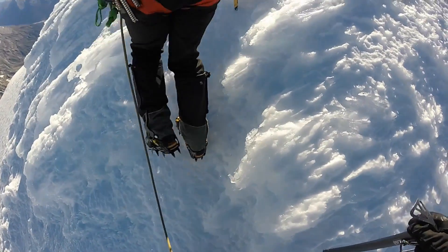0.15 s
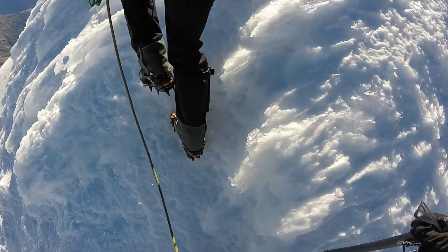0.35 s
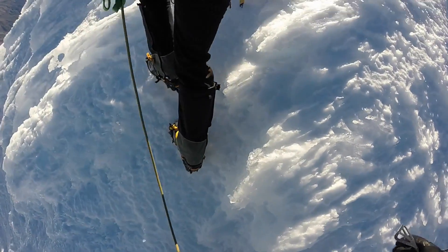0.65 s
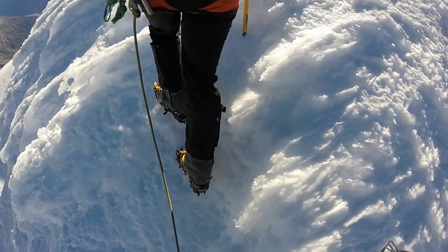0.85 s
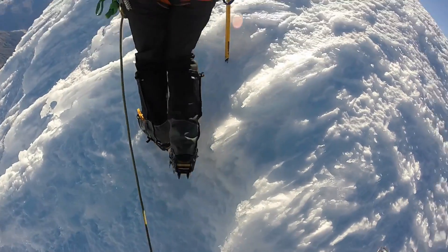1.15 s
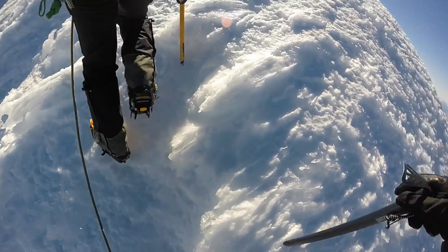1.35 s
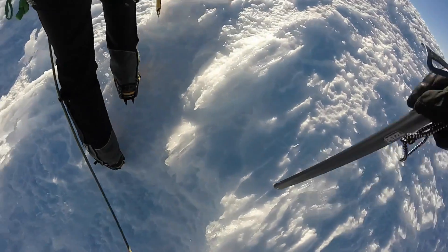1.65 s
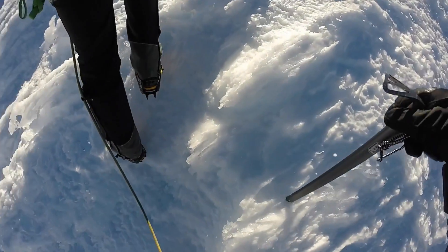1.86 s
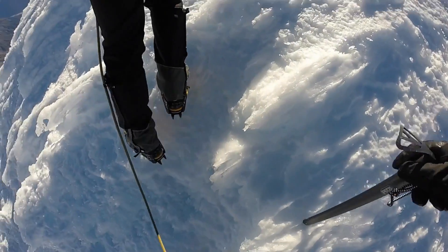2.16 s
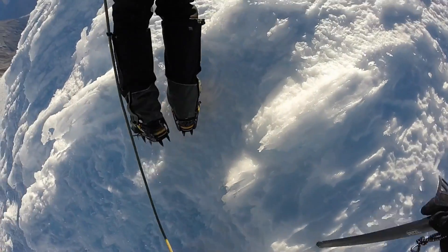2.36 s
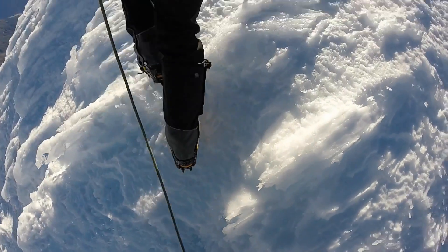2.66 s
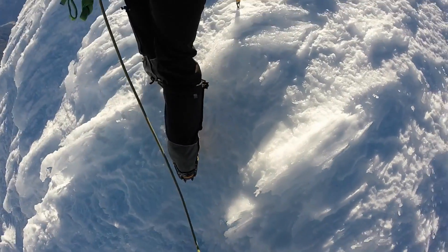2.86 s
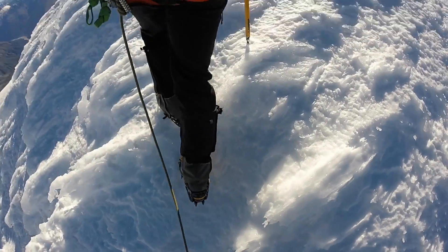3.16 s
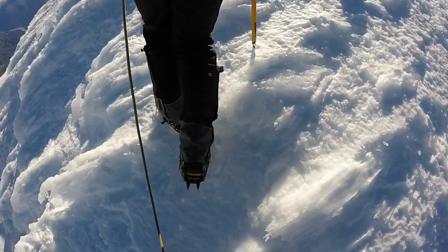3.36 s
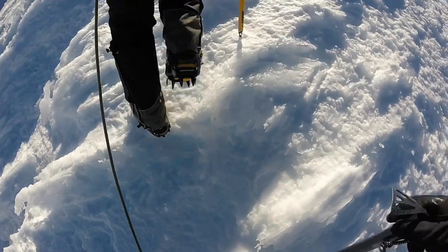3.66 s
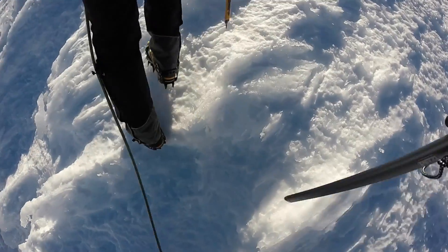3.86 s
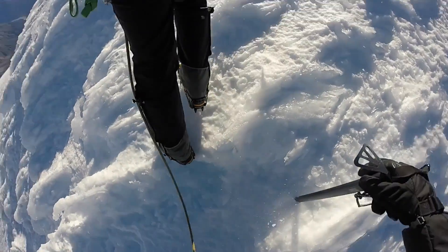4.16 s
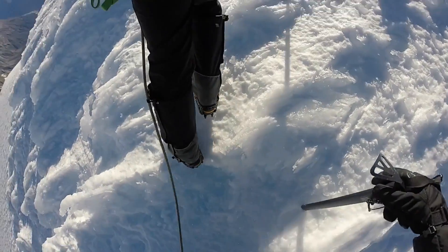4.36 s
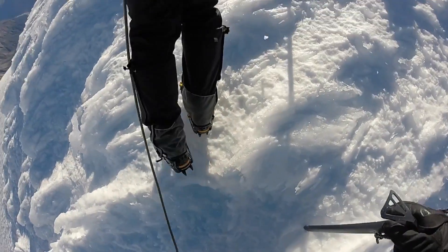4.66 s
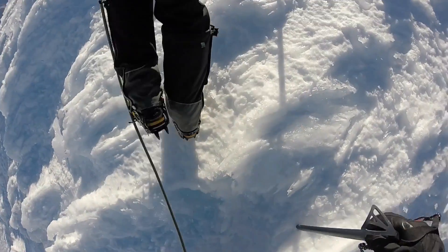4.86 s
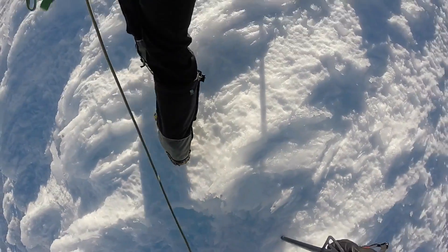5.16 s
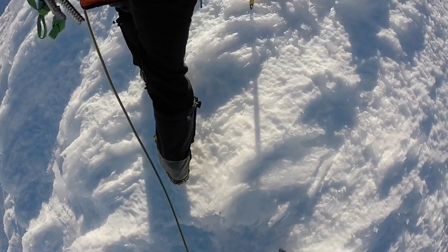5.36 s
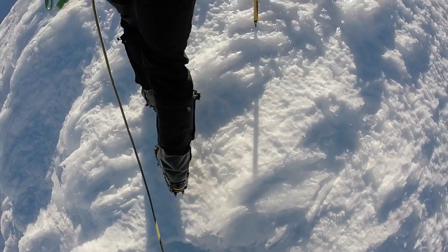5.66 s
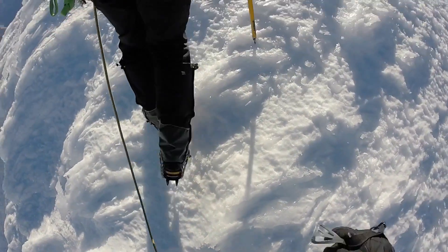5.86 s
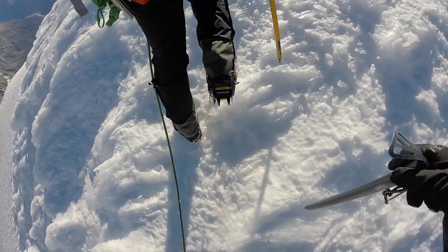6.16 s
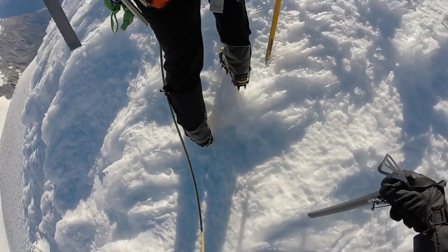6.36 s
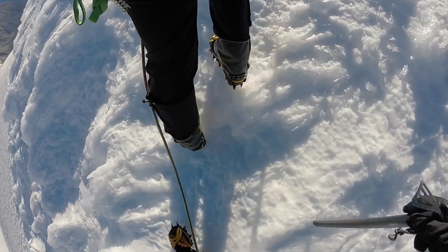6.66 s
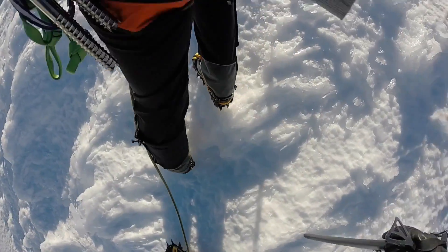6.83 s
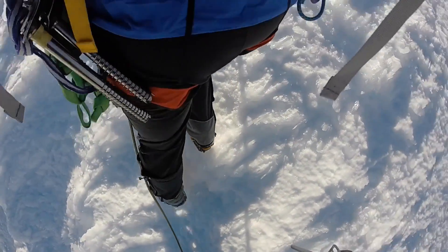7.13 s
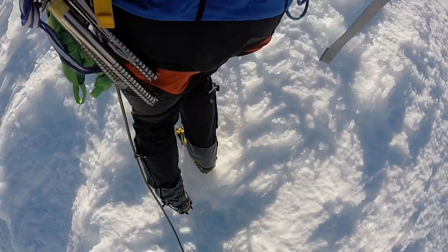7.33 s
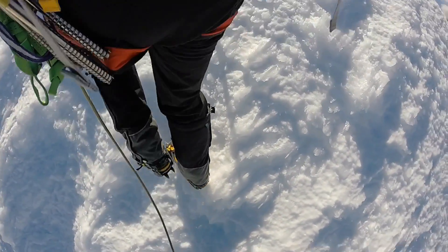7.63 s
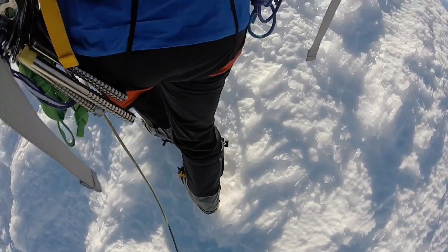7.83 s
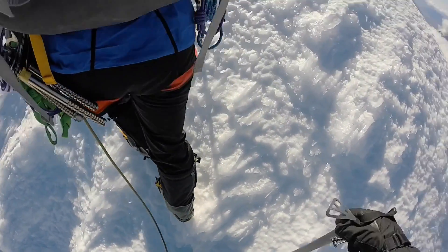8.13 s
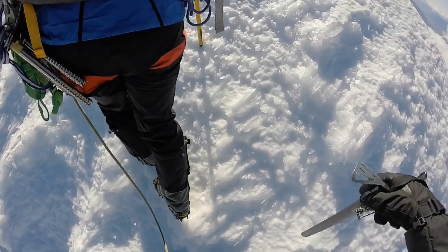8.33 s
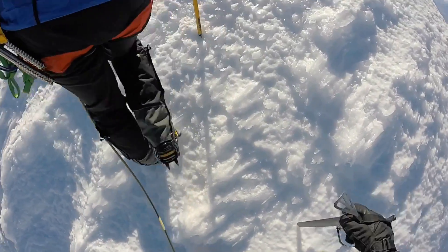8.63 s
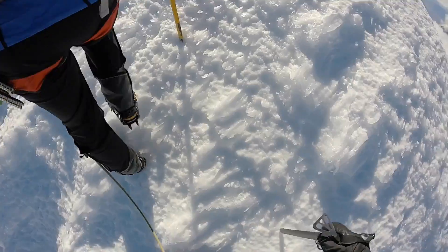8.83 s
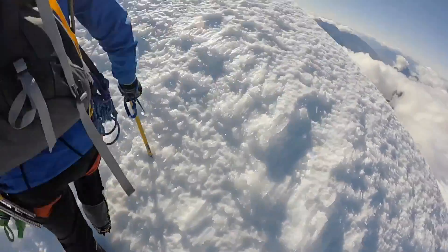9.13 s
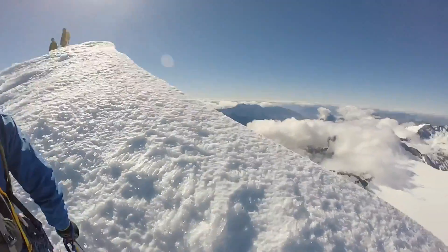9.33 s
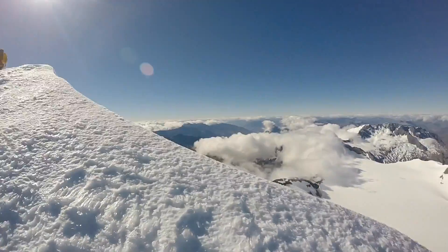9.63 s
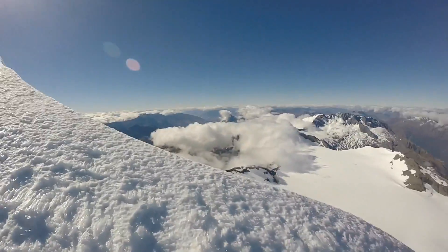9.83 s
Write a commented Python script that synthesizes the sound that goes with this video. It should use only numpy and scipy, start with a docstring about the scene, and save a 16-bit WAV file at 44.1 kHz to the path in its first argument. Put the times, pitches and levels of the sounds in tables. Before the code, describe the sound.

On an open snowy ridge, spiked boots crunch through icy crust close to a microphone in a hard, slightly boxy case. From the start, grainy treads overlap at uneven walking pace, while deep, soft wind thumps bump irregularly over low rumble and faint air. A gust flutters near 1 s; crisp bites and cracks follow at 1.6 and 1.75, with dull fabric swishes around 1.3 to 1.7 and 2.4. A light scrape passes at 2.6. The heaviest wind thump lands about 3.2, just before thin steel squeaks until 3.4. A sharp spike bite breaks at 4.1, and a fuller crunch comes at 4.6, with strong thumps near 4.9. Carabiners clatter quickly around 6.45, then a firm step at 6.7. Short scrapes touch at 6.8 and 7.8. After 8.8 the crunch softens and lengthens, gusts flutter near 9.2, a small metal tick sounds at 9.46, and ice cracks at 9.5.

```python
"""A ridge of crusted snow: two roped climbers walk up it in crampons, heard beside a wind-struck hard case.
The snow crunches as filtered random grains gated by each tread; spikes and cracks are short resonant bursts.
Clothing swishes as coloured grains; metal gear clinks, squeaks and scrapes with modes, tones and resonances.
Wind thumps the case as uneven low sines over rumble, with fluttering gusts and a soft rush of air."""
import sys
import numpy as np
from scipy import signal
from scipy.fft import rfft, irfft, next_fast_len
from scipy.io import wavfile
from scipy.ndimage import uniform_filter1d

SR = 44100
rng = np.random.default_rng(int(sys.argv[2]) if len(sys.argv) > 2 else 0)


def bounce(signal):
    """Save signal as a 16-bit WAV file at the path given by the first command-line argument."""
    frames = np.transpose(np.atleast_2d(signal))
    limited = np.clip(frames, -1, 1)
    pcm = np.round(limited * 32767).astype(np.int16)
    wavfile.write(sys.argv[1], SR, pcm)


N = 440559
TIME = np.arange(N) / SR


def from_db(db):
    """Decibels to gain."""
    return 10 ** (np.asarray(db) / 20)


def rms_one(x):
    """Scale to rms 1."""
    return x / np.sqrt(np.mean(x ** 2) + 1e-20)


def in_time(rows):
    """Draw each column of a breakpoint table as a curve, sample by sample."""
    s, *columns = np.transpose(rows)
    return [np.interp(TIME, s, column) for column in columns]


def at_hz(spectrum, hz):
    """Read a spectrum on a log-frequency axis."""
    points, db = np.transpose(spectrum)
    return np.interp(np.log(hz), np.log(points), db)


def colour(x, spectrum):
    """Shape x with a smooth spectrum; rms 1."""
    size = next_fast_len(N)
    bins = np.maximum(np.arange(size // 2 + 1) * SR / size, 1)
    shaped = rfft(x, size) * from_db(at_hz(spectrum, bins))
    return rms_one(irfft(shaped, size)[:N])


def drift(rate):
    """Random curve with rms 1, bending at `rate` points a second."""
    knots = rng.standard_normal(N // 40)
    return rms_one(np.interp(TIME * rate, np.arange(len(knots)), knots))


def even(x, span_s):
    """Hold the level near rms 1 over spans of this length; finer detail stays."""
    power = uniform_filter1d(x ** 2, max(int(span_s * SR), 2))
    return x / np.sqrt(np.abs(power) + 1e-9)


def band(x, hz, kind):
    """Butterworth filter, design order 2."""
    return signal.sosfilt(signal.butter(2, hz, kind, fs=SR, output="sos"), x + 1e-18)


def ring(x, hz, t60):
    """A unit click sets a sine of initial height 1 ringing, down 60 dB after t60 seconds."""
    r, w = from_db(-60 / (t60 * SR)), 2 * np.pi * hz / SR
    return signal.lfilter([0, np.sin(w)], [1, -2 * r * np.cos(w), r * r], x + 1e-18)


def resonance(x, hz, width_hz):
    """One resonance with gain 1 at its peak."""
    return signal.lfilter(*signal.iirpeak(hz, hz / width_hz, fs=SR), x)


def grains(per_s, spread_db):
    """Random clicks of either sign, many small and a few large."""
    sizes = from_db(spread_db * np.minimum(rng.exponential(1, N), 4))
    signed = sizes * rng.choice([-1, 1], N)
    return signed * (rng.random(N) < per_s / SR)


def slips(per_s, spread_db, fall_s):
    """Sudden failures of the snow, each dying away exponentially; rms 1."""
    failures = np.abs(grains(per_s, spread_db))
    return rms_one(signal.lfilter([1], [1, -np.exp(-1 / (fall_s * SR))], failures + 1e-18))


def after(s):
    """The samples of the tenth of a second that follows s, and their age."""
    span = slice(int(s * SR), int(s * SR) + SR // 10)
    return span, TIME[span] - TIME[span.start]


def bursts(rows, fall_s):
    """Envelope of (start_s, length_s, level_db) rows: a quick rise, a hold, an exponential fall."""
    out = np.zeros(N)
    for s, length, db in rows:
        start = int(s * SR)
        t = TIME[:min(N - start, SR // 2)]
        rise = np.minimum(t / 0.0011, 1)
        fall = np.exp(-np.maximum(t - length, 0) / fall_s)
        out[start:start + len(t)] += from_db(db) * rise * fall
    return out


def swells(rows):
    """Sum of bell-shaped envelopes from (middle_s, half_length_s, level_db) rows."""
    steps = TIME[::100]   # drawn coarsely, then interpolated
    bells = sum(from_db(db) * np.exp(-.5 * ((steps - s) / half) ** 2) for s, half, db in rows)
    return np.interp(TIME, steps, bells)


def pushes(rows, attack_s, release_s):
    """Envelope of (start_s, length_s, level_db, growth_db) rows; overlaps add in power."""
    power = np.zeros(N)
    for s, length, db, growth_db in rows:
        span = slice(max(int(s * SR), 0), int((s + length + 1) * SR))
        t = TIME[span] - s
        hold = from_db(db + growth_db * (np.clip(t / length, 0, 1) - .5))   # grows or sags
        attack = np.clip(t / attack_s, 0, 1)
        release = np.exp(-np.maximum(t - length, 0) / release_s)
        power[span] += (hold * attack * release) ** 2
    return np.sqrt(power)


# loose snow shifting between the treads: time_s, crunch_db, fine_grains_db
SETTLING = [(0.0, -51.5, -55), (4.0, -52.5, -61.5), (10.0, -57.5, -75)]
# boots loading the snow: start_s, length_s, crunch_db, growth_db, fine_against_crunch_db
TREADS = [(0.039, 0.038, -40, 2, -9.5), (0.173, 0.42, -48.5, 0, -8.5), (0.495, 0.39, -44.5, -7.5, -16),
          (0.746, 0.32, -43, 7.5, -26), (1.615, 0.23, -49, 7, -22), (1.828, 0.37, -43.0, -8, -21),
          (2.345, 0.29, -45.5, 1.5, -12), (2.943, 0.31, -46.5, 5.5, -18), (3.41, 0.3, -47.5, -10.5, -14),
          (3.67, 0.29, -50.5, 4, -21), (4.298, 0.15, -43.5, 0.5, -14), (4.57, 0.43, -41, 5, -12.5),
          (5.126, 0.041, -43.5, -5, -17.5), (5.232, 0.2, -46.5, -12, -12), (5.384, 0.35, -45, 10, -15),
          (5.88, 0.057, -47.5, 4, -18), (6.04, 0.023, -48.5, 11, -20), (6.678, 0.14, -40, -2, -12),
          (6.878, 0.36, -45, 2.5, -13), (7.565, 0.38, -43, 9, -12.5), (7.995, 0.39, -46.5, 14.5, -16),
          (8.503, 0.12, -41.5, -10.5, -18.5), (8.651, 0.4, -46, -10, -10), (8.83, 0.88, -49.5, 5, -12.5)]


def footwork(attack_s=0.036, release_s=0.046):
    """Level of the crunch, and of its fine grains against it, as boots load and leave the snow."""
    rest_db, rest_fine_db = in_time(SETTLING)
    coarse_rows = [(s, length, db, growth) for s, length, db, growth, fine in TREADS]
    fine_rows = [(s, length, db + fine, growth) for s, length, db, growth, fine in TREADS]
    coarse = np.hypot(pushes(coarse_rows, attack_s, release_s), from_db(rest_db))
    grit = np.hypot(pushes(fine_rows, attack_s, release_s), from_db(rest_fine_db))
    return 20 * np.log10(coarse), 20 * np.log10(grit / coarse)


# spectrum of the crunch: pitch_hz, level_db
CRUNCH = [(200, -3.5), (500, -7), (1000, -8.5), (1600, -4), (2400, -2.5), (3200, 5), (4200, -2),
          (6500, -6.5)]


def crunch(level_db, fine_db, creep=0.94, own_share=0.67, patchy_db=2.0, top_db=-4.0):
    """Snow fails in small slips, each a short avalanche of grains; every grain size also slips by itself."""
    load = creep + slips(per_s=150, spread_db=3.0, fall_s=0.0066)   # slips shared by all grain sizes
    edges = np.geomspace(250, 7500, 13)   # one band per grain size
    coarse = np.zeros(N)
    for low, high in zip(edges, edges[1:]):
        own = slips(per_s=130, spread_db=2.5, fall_s=.01)
        snaps = grains(per_s=3200, spread_db=2.0) * (load + own_share * own)
        band_db = at_hz(CRUNCH, np.sqrt(low * high)) + patchy_db * drift(18)
        coarse += band(snaps, [low, high], "band") * from_db(band_db)
    fine_spectrum = [(5000, -11.5), (7500, 2.5), (9000, -1.5), (12000, -5.0), (15500, -18.0)]
    fine = colour(load * grains(per_s=8300, spread_db=2.5), fine_spectrum)
    return from_db(level_db) * (even(coarse, 0.087) + from_db(fine_db + top_db) * even(fine, 0.41))


def chips(level_db, chip_db=-14.0, cycles=32, splinter_db=-70.0, splinter_t60=0.031):
    """Bits of ice tick along with the treads; tiny splinters tinkle throughout; each kind has thirty pitches."""
    ticks, splinters = grains(per_s=110, spread_db=2.0), grains(per_s=35, spread_db=2.0)
    dealt = rng.integers(0, 30, N)   # which pitch a click at this sample would ring
    low, high = np.zeros(N), np.zeros(N)
    for k, hz in enumerate(np.geomspace(1500, 7000, 30)):
        low += ring(ticks * (dealt == k), hz, cycles / hz)   # down 60 dB after this many cycles
    for k, hz in enumerate(np.geomspace(6000, 12500, 30)):
        high += ring(splinters * (dealt == k), hz, splinter_t60) / hz   # higher ones are softer
    return from_db(level_db + chip_db) * rms_one(low) + from_db(splinter_db) * rms_one(high)


def off_the_crust(x, lag_s=0.001141, swing=0.3, echo=0.29):
    """The icy surface mirrors each sound just behind itself, at a lag that wanders slowly."""
    late = np.interp(TIME - lag_s * np.exp(swing * drift(7)), TIME, x)
    return (x + echo * late) / np.hypot(1, echo)


# resonances of a crampon's steel frame: pitch_hz, width_hz, level_db
CRAMPON = [(1857, 89, -1.5), (4862, 64, 2), (5610, 30, 1), (7470, 67, -4), (8530, 340, -4.5)]


def crampons(snow, ring_db=0.5):
    """The sound of the breaking snow sets the steel frame ringing in narrow resonances."""
    return sum(from_db(db + ring_db) * resonance(snow, hz, width) for hz, width, db in CRAMPON)


# spectrum of the soft rush: pitch_hz, level_db
AIR = [(59, -41), (100, 3.5), (582, -10.5), (1590, -18.5), (5000, -34)]


def air(level_db=-55):
    """Steady noise, coloured into a soft rush of air."""
    return from_db(level_db) * colour(rng.standard_normal(N), AIR)


def thumps(force, thump_db=-1.0, centre_hz=58, scatter=0.18):
    """Each eddy rocks the air at the case for a few slow, uneven cycles."""
    hz = centre_hz * (1 + scatter * drift(70))
    return force * from_db(thump_db) * np.sin(2 * np.pi * np.cumsum(hz) / SR)


# eddies of wind thumping on the case: middle_s, level_db
THUMPS = [(0.105, -21.5), (0.371, -12), (0.41, -20.5), (0.452, -19), (0.5, -23), (0.581, -17), (0.689, -18),
          (1.335, -27), (1.645, -21.5), (1.812, -22.5), (1.917, -18.5), (2.483, -15.5), (2.645, -17),
          (3.085, -18.5), (3.143, -14.5), (3.213, -6.5), (3.255, -20.5), (3.305, -21), (3.5, -20.5),
          (3.784, -19), (3.86, -15.5), (4.137, -25), (4.756, -12.5), (4.822, -14), (4.875, -8.5),
          (4.92, -23), (4.959, -14), (5.201, -22), (5.395, -12), (5.445, -12), (5.632, -17.5), (5.941, -21),
          (6.312, -25.5), (6.733, -21), (6.815, -24), (7.46, -14.5), (7.79, -19), (7.835, -13),
          (8.334, -15.5), (8.41, -19.5), (8.788, -10.5), (8.905, -22), (8.953, -20), (9.566, -20.5),
          (9.68, -18), (9.74, -18)]
# stronger gusts that flutter across the case: middle_s, half_length_s, level_db
GUSTS = [(0.996, 0.077, -40.5), (2.59, 0.046, -42), (3.17, 0.12, -46.5), (5.8, 0.045, -43.5),
         (9.215, 0.058, -38.5), (9.33, 0.095, -42.5)]
# spectra of the low rumble and of the flutter: pitch_hz, level_db
THUMP = [(12, -16), (25, -2), (60, 0), (85, -8), (105, -19), (150, -33.5), (300, -49.5), (2000, -82)]
FLUTTER = [(50, 0.5), (150, 10), (280, -1), (500, -7), (1000, -15), (2500, -14.5), (8000, -64)]


def wind(calm_db=-41.0, wake_db=-6.5, wake_s=0.068, lull_db=3.0, thump_half_s=0.017):
    """Separate thumps, each trailing a wake of low rumble; strong gusts flutter higher up."""
    force = swells([(s, thump_half_s, db) for s, db in THUMPS])
    linger = np.exp(-1 / (wake_s * SR))
    wake = signal.lfilter([1 - linger], [1, -linger], force + 1e-18)
    rumble_level = from_db(calm_db + lull_db * drift(9)) + from_db(wake_db) * wake
    rumble = even(colour(rng.standard_normal(N), THUMP), 0.107) * rumble_level
    flutter = colour(rng.standard_normal(N) * from_db(3.2 * drift(60)), FLUTTER)
    return rumble + thumps(force) + swells(GUSTS) * flutter


# resonances and hollows of the hard case: pitch_hz, width_hz, gain_db
CASE = [(1061, 300, 8.5), (1164, 292, -7.5), (1593, 142, 9), (2526, 260, 3.5), (4860, 730, -7),
        (7380, 384, -11.5), (10600, 650, 4)]


def case(x):
    """The hard shell lifts some narrow bands and hollows others."""
    for hz, width, db in CASE:
        x = x + (from_db(db) - 1) * resonance(x, hz, width / from_db(db / 2))
    return x


# points dragging over the ice with a rough ring: middle_s, half_length_s, level_db, pitch_hz
SCRAPES = [(0.425, 0.024, -45.5, 1570), (2.6, 0.15, -48.5, 976), (3.8, 0.051, -46.5, 3200),
           (5.72, 0.029, -43.5, 5700), (6.832, 0.019, -41, 3360), (7.78, 0.034, -41, 2580),
           (9.35, 0.013, -43.5, 3000), (9.655, 0.015, -44, 3980)]


def scrapes(width_share=0.12):
    """A dragging point catches over and over, each catch ringing the same narrow resonance."""
    catches, out = grains(per_s=800, spread_db=2.5), np.zeros(N)
    for s, half, db, hz in SCRAPES:
        width = hz * width_share
        rough_ring = resonance(resonance(catches, hz, width), hz, width)
        out += even(rough_ring, 0.053) * swells([(s, half, db)])
    return out


# single cracks of ice: start_s, level_db (before crack_db), pitch_hz
CRACKS = [(0.494, -29, 3770), (0.612, -31, 1500), (0.799, -32, 2580), (0.876, -30, 2620), (0.9, -22, 2580),
          (1.113, -30.5, 2670), (1.5625, -24, 3550), (1.58, -15, 3130), (1.7485, -15, 2740),
          (2.038, -21.5, 2730), (3.143, -30, 1630), (3.464, -31, 1900), (3.6, -22.5, 3700),
          (3.878, -19, 2560), (4.109, -23, 2920), (4.362, -28, 3300), (4.42, -20.5, 1900),
          (4.449, -28, 2670), (4.575, -30.5, 3080), (4.669, -26, 3900), (4.699, -30, 3000),
          (5.185, -28.5, 3400), (5.275, -26.5, 2620), (6.055, -34, 2190), (6.288, -20, 2800),
          (6.369, -32.5, 2700), (6.389, -25.5, 2710), (7.874, -25, 3580), (7.955, -25.5, 2710),
          (8.662, -31, 2500), (8.971, -21, 2600), (9.524, -23, 3660), (9.541, -18.5, 3900),
          (9.561, -31, 2600)]
# spectrum of breaking ice, shared by cracks and bites: pitch_hz, level_db
BITE = [(300, -6.5), (1000, -4), (1800, -1.5), (4200, 2.5), (6500, -1.5), (9000, -12), (15000, -24)]


def cracks(crack_db=-8.5, ring_db=12.5, width_hz=600, hold_s=0.0025, quickening=0.8):
    """A plate of ice snaps in milliseconds at its own pitch; the harder the snap, the quicker it is over."""
    snap, out = colour(rng.standard_normal(N), BITE), np.zeros(N)
    usual_db = np.mean(CRACKS, axis=0)[1]
    for s, db, hz in CRACKS:
        span, t = after(s)
        age = t * from_db(quickening * (db - usual_db) / 2)   # time runs faster in harder snaps
        plate = even(snap[span] + from_db(ring_db) * resonance(snap[span], hz, width_hz), hold_s)
        out[span] += from_db(db + crack_db) * plate * np.exp(-np.maximum(age - hold_s, 0) / 0.003)
    return out


# buckles, rings and other small metal parts: start_s, level_db (before tinkle_db), pitch_hz
TINKLES = [(1.0, -51, 11900), (1.332, -49, 6630), (1.5035, -52, 10600), (3.4974, -48, 10600),
           (3.601, -40, 8470), (4.177, -55, 6400), (6.296, -39, 4860), (9.463, -30, 1930)]


def buckles(tinkle_db=4.5, t60=0.049, tick_s=0.001, tick_db=-10.0):
    """Each small metal part ticks and rings with one tone."""
    out = np.zeros(N)
    for s, db, hz in TINKLES:
        span, t = after(s)
        tick = rng.standard_normal(len(t)) * np.exp(-t / tick_s) * from_db(tick_db)
        tone = np.exp(-np.log(1000) * t / t60) * np.sin(2 * np.pi * hz * t)
        out[span] += from_db(db + tinkle_db) * (tick + tone)
    return out


# sleeves and trouser legs brushing past: middle_s, half_length_s, level_db
SWISHES = [(1.28, 0.082, -44), (1.735, 0.032, -38), (2.44, 0.035, -41.5), (2.64, 0.25, -51),
           (5.95, 0.2, -50.5), (6.66, 0.047, -48.5), (6.76, 0.02, -45.5), (8.11, 0.085, -45.5),
           (9.19, 0.093, -42.5)]
# spectrum of the fabric: pitch_hz, level_db
SWISH = [(200, 0), (450, -3), (700, -11), (950, -1), (1600, -4), (2200, -3), (3200, -9.5), (5000, -37),
         (12000, -49)]


def clothing(rough_db=1.5):
    """Stiff fabric rubs thread over thread in a dense, dull swish."""
    threads = grains(per_s=7000, spread_db=5.0) * from_db(rough_db * drift(120))
    return swells(SWISHES) * colour(threads, SWISH)


# spikes biting through the crust: start_s, length_s, level_db, slab_against_bite_db, plate_pitch_hz
BITES = [(1.557, 0.035, -34, -25, 3480), (1.75, 0.031, -31, -21, 2600), (2.786, 0.029, -38.5, -15, 2740),
         (3.828, 0.056, -38, -16, 3340), (4.0956, 0.025, -27.5, -12, 3080), (6.278, 0.017, -33, -20, 2900),
         (6.381, 0.024, -36.5, -18, 2860), (6.897, 0.012, -36.5, -20, 2900), (7.427, 0.023, -39, -10, 2860),
         (8.952, 0.022, -33.5, -24, 2700), (9.52, 0.022, -36, -26, 3820)]


def bites(snag_db=2.5, arch_db=3.5, fall_s=0.01, plate_width_hz=450, plate_db=5):
    """A spike shatters the crust in a snagging, ringing arch; the slab under it breaks duller and longer."""
    shards = colour(grains(per_s=6000, spread_db=2.5), BITE)
    snags = even(from_db(snag_db * drift(400)), 0.0021)
    slab_spectrum = [(100, 16), (400, 7.5), (2200, 1), (5000, -32)]
    slab = even(colour(grains(per_s=1500, spread_db=2), slab_spectrum), 0.0174)
    slab_rows = [(s + length / 2, 2 * length, db + dull) for s, length, db, dull, hz in BITES]
    out = slab * bursts(slab_rows, fall_s=0.026)
    for s, length, db, dull, hz in BITES:
        span, t = after(s)
        plate_ring = from_db(plate_db) * resonance(shards[span], hz, plate_width_hz)
        plate = even(shards[span] + plate_ring, 0.0048)
        arch = from_db(db - arch_db * (2 * np.minimum(t / length, 1) - 1) ** 2)   # strongest halfway
        out[span] += plate * snags[span] * arch * np.exp(-np.maximum(t - length, 0) / fall_s)
    return out


# tones of steel squeaking against steel: start_s, length_s, level_db, pitch_hz (at the start, before waver)
SQUEAKS = [(3.01, .09, -50, 1945), (3.28, .11, -47, 1905), (3.345, .075, -52, 4820), (3.34, .09, -50, 3930),
           (3.39, .04, -52, 6040)]


def squeaks(waver=.011, broken_db=4.5, rise_per_s=.33):
    """Steel sticks and slips; each tone creeps upward, wavers and breaks up."""
    unsteady, out = waver * drift(500), np.zeros(N)
    for s, length, db, hz in SQUEAKS:
        pitch = hz * (1 + unsteady + rise_per_s * np.clip(TIME - s, 0, length))
        out += bursts([(s, length, db)], fall_s=0.0089) * np.sin(2 * np.pi * np.cumsum(pitch) / SR)
    return out * even(from_db(broken_db * drift(200)), .04)


# carabiners knocking together: start_s, level_db (before knock_db)
CLINKS = [(6.427, -25), (6.444, -26), (6.464, -18.5), (6.4904, -22.5)]
# ringing modes of a carabiner: pitch_hz, level_db, t60_s
CARABINER = [(1640, -14, 0.018), (3005, -11, 0.035), (3960, -3, 0.018), (4366, -12, 0.03),
             (4950, -21, 0.05), (5710, -13, 0.05)]


def carabiners(knock_db=-9.5, chatter_db=-4.5, clack_db=1.0):
    """Each knock sets the modes ringing, and the gates chatter in a dry clatter of small contacts."""
    s, db = np.transpose(CLINKS)
    chatter_rows = [(at, .005, level + knock_db) for at, level in CLINKS]
    chatter = from_db(chatter_db) * bursts(chatter_rows, fall_s=0.005)
    out = from_db(clack_db) * chatter * band(grains(per_s=3000, spread_db=3.5), [2000, 9000], "band")
    for hz, mode_db, t60 in CARABINER:
        knocks = chatter * grains(per_s=700, spread_db=0)
        knocks[(s * SR).astype(int)] = from_db(db + knock_db)
        out += from_db(mode_db) * ring(knocks, hz, t60)
    return out


def scene():
    """Snow, clothing, air and wind pass through the case; the metal gear is added directly."""
    level_db, fine_db = footwork()
    snow = off_the_crust(crunch(level_db, fine_db) + chips(level_db) + bites() + cracks())
    gear = crampons(snow) + carabiners() + buckles() + squeaks() + scrapes()
    return (case(snow + clothing() + air() + wind()) + gear)[None]


def record(dry, cutoff_hz=15400):
    """A steep elliptic low-pass cuts off the top."""
    return signal.sosfilt(signal.ellip(10, .2, 80, cutoff_hz, fs=SR, output="sos"), dry)


dry = scene()
out = record(dry)
bounce(out)
```